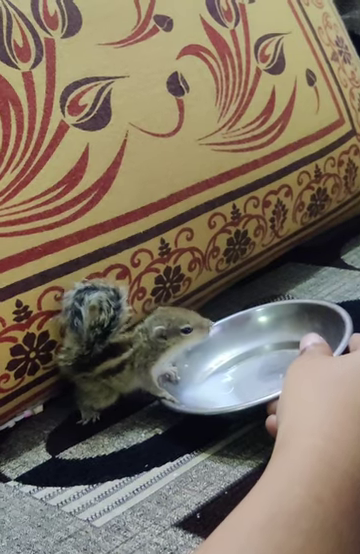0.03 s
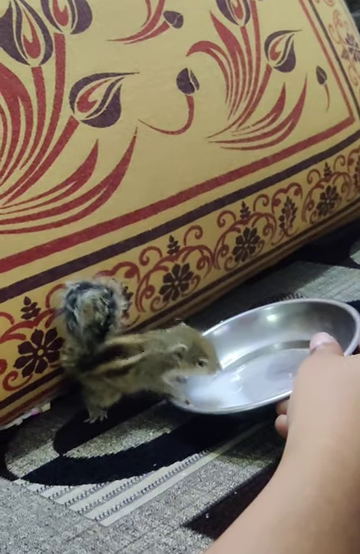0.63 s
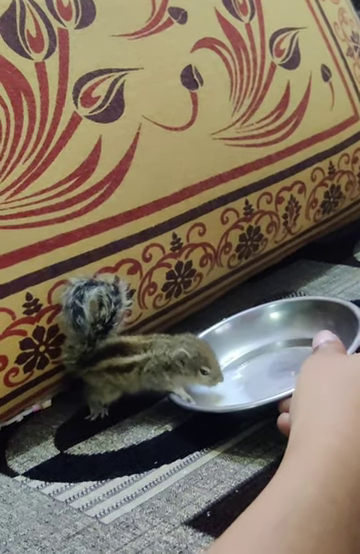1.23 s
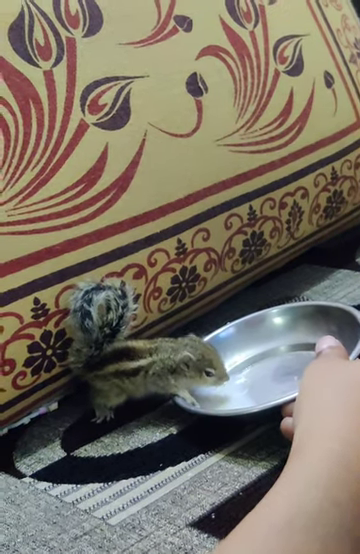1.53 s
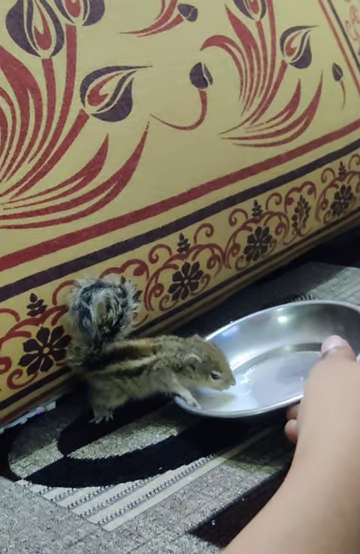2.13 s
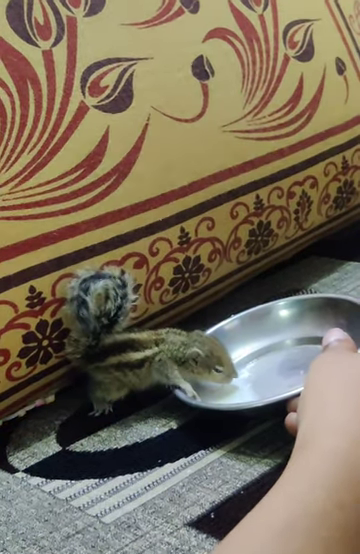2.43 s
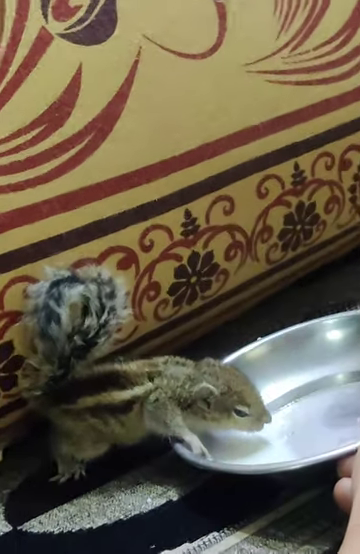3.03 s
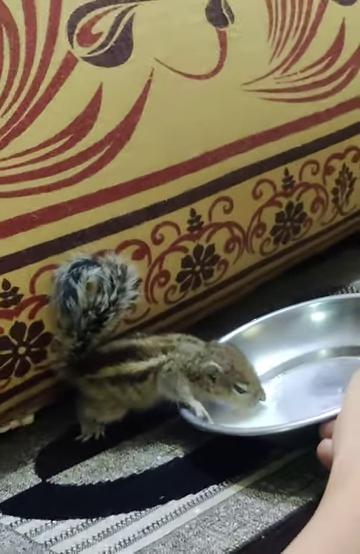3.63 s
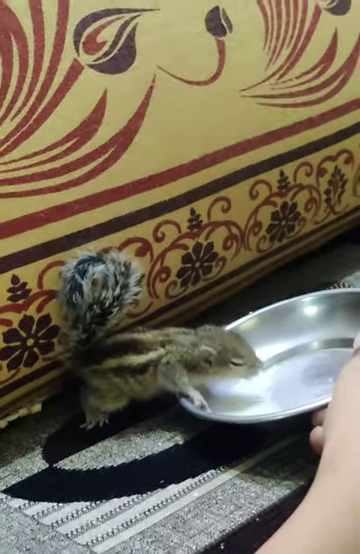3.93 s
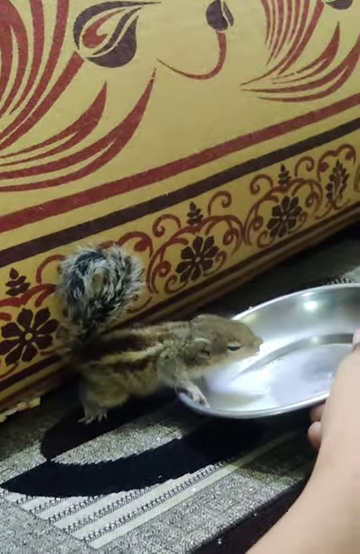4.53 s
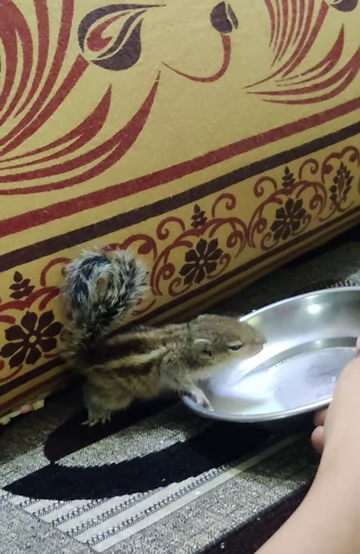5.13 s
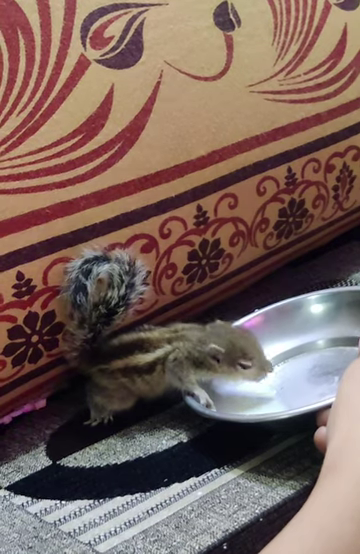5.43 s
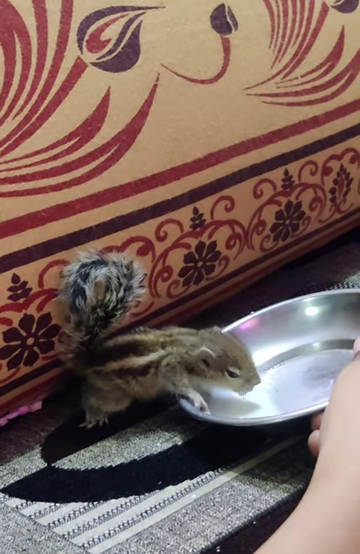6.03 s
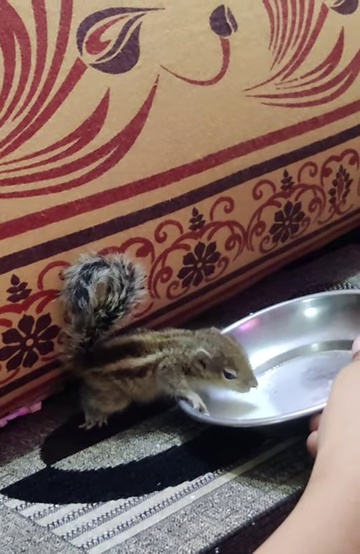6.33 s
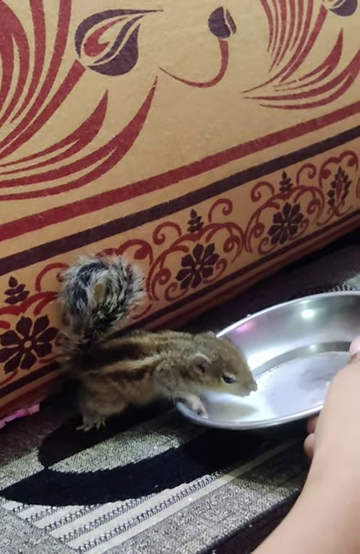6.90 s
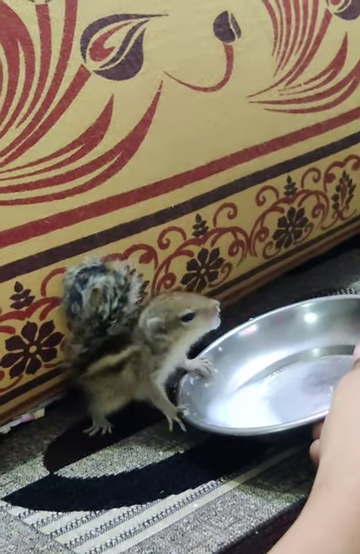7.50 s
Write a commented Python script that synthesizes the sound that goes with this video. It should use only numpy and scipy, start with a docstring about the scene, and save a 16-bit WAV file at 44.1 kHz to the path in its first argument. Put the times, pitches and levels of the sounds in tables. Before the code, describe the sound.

Close to the microphone in a small room, a steel plate gives a bright, quickly choked clink, and a squirrel's claws tick lightly on it. After a knock and a lull, the plate shifts on a rug with a stuttering scrape and a cluster of clinks. Soft handling knocks, rustling cloth and a brief claw skid follow. Two crisp clinks, the loudest sounds, finish over a low-level hiss.

```python
"""A steel plate clinks on a rug as a young squirrel drinks from it, close up in a small, hard-walled room.
Each clink is a bright crack and a short ring, choked by the hand and the rug. The plate shifts in one
jerky stick-slip scrape; claws tick and skid on the steel. Underneath sit soft handling knocks, cloth
rustle, creaking fingers, a low wobble and one faint squeak, over a steady hiss with a thin whine."""
import sys
import numpy as np
from scipy import signal
from scipy.fft import rfft, irfft
from scipy.io import wavfile
from scipy.ndimage import uniform_filter1d

SR = 44100
rng = np.random.default_rng(int(sys.argv[2]) if len(sys.argv) > 2 else 0)


def generate_wav(signal):
    """Clip the signal to [-1, 1] and save it as 16-bit WAV at the path in sys.argv[1]."""
    frames = np.transpose(np.atleast_2d(signal))
    scaled = np.clip(frames, -1, 1) * 32767
    pcm = np.round(scaled).astype(np.int16)
    wavfile.write(sys.argv[1], SR, pcm)


N = 342216
TIME = np.arange(N) / SR

# modes of the hand-damped plate: f/Hz, relative level/dB, t60/s
PLATE_MODES = [(1271, -14, 0.044), (2084, -15.5, 0.25), (2131, -0.5, 0.053), (2950, -7, 0.023),
               (3250, -3.5, 0.06), (3744, -4.5, 0.02), (4150, -5.5, 0.034), (4230, 1.5, 0.016),
               (4455, -14, 0.042), (5959, -12, 0.033), (7160, -7, 0.059), (7400, -34, 0.03)]
# crack of the plate's dense modes: f/Hz, relative level/dB
CRACK_EQ = [(200, -56.5), (500, -21.5), (850, -24.5), (1300, -16), (1650, -15), (2200, -3.5), (2600, -6.5),
            (3250, 2.5), (4150, -7), (5000, -9), (6100, -4), (7600, -10), (8500, -12.5), (15000, -28.5)]
# rim hits: t/s, relative level/dB, ring trim/dB, contact cutoff/Hz, band the struck spot favours/Hz,
# its boost/dB, room send/dB, pitch factor of the grip
CLINKS = [(0.0269, -19.5, -15.5, 11600, 2180, 5, -7.5, 0.92), (3.1690, -20, 0, 3930, 2470, 17.5, -14, 1.06),
          (3.1739, -20.5, -10, 3760, 4400, 18, -7.5, 0.71), (3.3000, -25.5, 0.5, 3750, 2350, 11, -17, 1.05),
          (3.324, -31.5, 3, 5015, 4530, 17, -13, 0.92), (3.3530, -30.5, 3.5, 4120, 2130, 10, -21, 1.0),
          (3.8298, -29.5, 7, 4630, 2065, 8.5, -7.5, 0.98), (3.9588, -35, 3, 4660, 2130, 8, -13, .975),
          (4.2120, -22, 5, 5000, 4560, 6, -13, 1.054), (4.3132, -29.5, 8.5, 5030, 1260, 8, -16, 0.99),
          (6.9581, -11, -3.5, 10600, 7300, 3.5, -5.5, 1.03), (7.5608, -9.5, -6, 9600, 4090, 9, -4.5, 0.997)]
# jerks of the plate over the rug: t/s, hold/s, relative scrape level/dB, relative drag level/dB
SHOVES = [(3.005, 0.053, -51, -55), (3.177, 0.016, -35, -42.5), (3.245, 0.031, -56, -41.5),
          (3.324, 0.037, -33, -78), (3.424, 0.018, -37, -57)]
# tone of scraping steel: f/Hz, relative level/dB
SCRAPE_EQ = [(300, -16.5), (620, -9), (920, 1.5), (1700, -3), (2200, -1.5), (2700, -2.5), (3400, -3.5),
             (4600, -8.5), (5300, -13), (7300, -17), (15000, -46)]
# resonances of the skidding claw: f/Hz, width/Hz, relative level/dB
SCREECH_BANDS = [(1760, 56, -10), (2360, 200, -1), (3310, 150, 0)]
# claws and tongue on the steel: t/s, level/dB
TICKS = [(0.352, -47), (0.393, -48), (0.421, -62), (.478, -50.5), (0.559, -51.5), (0.738, -54),
         (0.769, -56), (3.864, -45), (6.397, -60)]
# handling bumps: t/s, level/dB, treble tilt/(dB per octave)
KNOCKS = [(.8950, -25.5, 2.5), (1.0100, -35.5, -.5), (2.935, -45, -4.5), (3.296, -29.5, 2),
          (3.705, -51.5, -6), (4.606, -42.5, -5), (4.6520, -30.5, -4), (4.8708, -26.5, -3),
          (4.986, -36.5, -2), (5.098, -38, -2.5), (5.144, -37, -1.5), (5.197, -33, -3.5),
          (5.281, -41, -2.5), (5.332, -36, -2.5), (5.362, -35, -3), (5.482, -39, -25), (5.618, -43.5, 0.5)]
# body of a bump: f/Hz, relative level/dB
KNOCK_EQ = [(40, -27), (130, -15), (220, -0.5), (300, 6), (500, -5.5), (1000, -5.5), (2000, -8),
            (4500, -19), (8000, -29.5), (15000, -56)]
# paws and plate landing on the rug: t/s, level/dB
LANDINGS = [(0.312, -64), (0.898, -44), (7.161, -61), (7.409, -70), (7.483, -57), (7.699, -62.5)]
# weight settling on the rug in two steps: t/s, relative level/dB
SETTLES = [(.91, -38.5), (1.023, -45)]
# tone of the dragging rug: f/Hz, relative level/dB
DRAG_EQ = [(30, -8), (55, -42), (120, -5.5), (200, -12), (350, -9.5), (455, 0.5), (560, -8.5), (680, -6),
           (1400, -42), (3000, -28), (12000, -68)]
# cloth strokes: peak t/s, release/s, relative level/dB
CLOTH_STROKES = [(.38, 0.33, -57.5), (.77, .15, -68), (1.086, 0.052, -49), (3.92, 0.4, -54),
                 (4.38, 0.25, -52.5), (4.67, 0.04, -52.5), (4.83, 0.29, -45.5), (5.2, 0.15, -58),
                 (5.5, 0.63, -63)]
# tone of the cloth: f/Hz, relative level/dB
CLOTH_EQ = [(60, -14.5), (500, -4.5), (1100, -7), (2300, -4.5), (3000, -2), (7400, -6.5), (10000, -16),
            (15000, -31)]
# fingers tightening: t/s, hold/s, relative level/dB
GRIPS = [(4.492, 0.015, -52.5), (4.766, .015, -48), (5.013, .01, -47.5), (5.068, 0.057, -44),
         (5.149, 0.046, -43), (5.33, .025, -46)]
# tone of creaking fingers: f/Hz, relative level/dB
CREAK_EQ = [(70, -55), (130, -12), (280, -2.5), (550, -0.5), (800, -6.5), (1550, -4.5), (2150, -18),
            (3500, -37), (7000, -61), (14000, -77)]
# moves of the hand holding the phone: t/s, hold/s, level/dB
SWAYS = [(0.948, 0.042, -50), (2.945, 0.14, -64.5), (3.123, .35, -55.5)]
# pitch line of the squeak: t/s, f/Hz
SQUEAK_GLIDE = [(5.44, 11350), (5.499, 10600), (5.545, 11700), (5.585, 11750), (5.639, 10500),
                (5.749, 8700), (5.81, 8160)]
# tone of the hiss bed: f/Hz, relative level/dB
HISS_EQ = [(30, -3.5), (60, -3), (115, -20), (160, -9.5), (500, -11), (800, -11), (1300, -9.5),
           (1600, -2.5), (2300, -0.5), (3600, -5), (4900, -12.5), (7300, -15.5), (11000, -26.5),
           (15500, -37)]
# partials of the electric whine: f/Hz, level/dB
WHINE_TONES = [(631, -84), (2891, -80), (3451, -76.5), (5782, -83), (10470, -93)]
# early reflections off the nearest surfaces: delay/s, relative gain
ECHOES = [(0.0146, 0.48), (0.023, 0.12), (0.034, 0.16)]

SHOVE_RELEASE_S = 0.056


def clinks(spot_octaves=0.17, ring_trim_db=-8, crack_trim_db=-3, upward_db=2):
    """Each touch on the rim rings the plate; soft contact loses treble and each spot favours some modes."""
    out = np.zeros(N)
    for s, db, ring_db, cutoff_hz, spot_hz, spot_db, room_db, grip in CLINKS:
        def contact(hz):
            boost_db = spot_db * np.exp(-(np.log2((hz + 1) / spot_hz) / spot_octaves) ** 2)
            return boost_db - 10 * np.log10(1 + (hz / cutoff_hz) ** 4)
        crack = burst(t60=0.032, rise_s=0.00058, db_at=lambda hz: shape(CRACK_EQ, hz) + contact(hz))
        add(out, s, undb(db + crack_trim_db) * room(crack, room_db))
        # the flat face throws its ring upwards, so the ring is wetter than the crack
        ring = room(plate_ring(contact, grip), room_db + upward_db)
        add(out, s, undb(db + ring_trim_db + ring_db) * ring)
    return out


def plate_ring(db_at, grip):
    """The plate's modes die away after one touch, weighted by db_at(Hz) and retuned by the grip."""
    t = TIME[:SR // 4]
    modes = np.zeros(len(t))
    for hz, db, t60 in PLATE_MODES:
        decay = undb(db + db_at(hz) - 60 * t / t60)
        modes += decay * np.sin(2 * np.pi * (hz * grip * t + rng.random()))
    return modes * (1 - np.exp(-t / 0.00025))  # the wave takes a moment to fill the plate


def scrape(trim_db=-3, bite_s=0.06, sing_db=-14):
    """Steel rubs and its rim sings at each shove; later a claw skids, ever louder until it lets go."""
    rub = disperse(friction(SCRAPE_EQ, slips_per_s=380, spread_db=1.5, smooth=0.45), lag_s=0.005)
    sing = undb(sing_db) * unit(resonate(rub, hz=4580, width_hz=200))
    screech = unit(sum(undb(db) * resonate(rub, hz, width) for hz, width, db in SCREECH_BANDS))
    shoved = sum(swell(s, hold, db, bite_s, SHOVE_RELEASE_S) for s, hold, db, _ in SHOVES)
    skid = swell(s=4.829, hold_s=0, db=-38, attack_s=0.05, release_s=0.014)
    return undb(trim_db) * shoved * (rub + sing) + skid * screech


def disperse(x, lag_s):
    """Bending waves smear each slip: 1 kHz arrives after lag_s, the treble sooner and the bass later."""
    hz = np.arange(N // 2 + 1) * SR / N
    return irfft(rfft(x) * np.exp(-4j * np.pi * lag_s * np.sqrt(hz * 1000)), N)


def ticks(room_db=-2):
    """Claws and tongue tap the steel, too lightly to make it ring."""
    out = np.zeros(N)
    for s, db in TICKS:
        tick = burst(t60=0.033, rise_s=0.00023, db_at=lambda hz: shape(CRACK_EQ, hz))
        add(out, s, undb(db) * room(tick, room_db))
    return out


def knocks(t60=0.028, rise_s=0.00021, room_db=-7):
    """Dull bumps of hand and plate; the harder ones tend to be brighter."""
    out = np.zeros(N)
    for s, db, tilt_db in KNOCKS:
        blow = burst(t60, rise_s, lambda hz: shape(KNOCK_EQ, hz) + tilt_db * np.log2(1 + hz / 400))
        add(out, s, undb(db) * room(blow, room_db))
    return out


def landings(cutoff_hz=210):
    """Paws and plate come down on the rug: cushioned thuds, all low end."""
    out = np.zeros(N)
    for s, db in LANDINGS:
        thud = burst(t60=0.18, rise_s=0.0041, db_at=lambda hz: -10 * np.log10(1 + (hz / cutoff_hz) ** 6))
        add(out, s, undb(db) * thud)
    return out


def rug_drag(trim_db=-2):
    """The rug catches and slips with a dark grain as the plate is shoved or weight settles."""
    shoved = sum(swell(s, hold, db, attack_s=0.089, release_s=SHOVE_RELEASE_S) for s, hold, _, db in SHOVES)
    settled = sum(swell(s, hold_s=0.0068, db=db, attack_s=0.011, release_s=0.045) for s, db in SETTLES)
    grain = friction(DRAG_EQ, slips_per_s=400, spread_db=3, smooth=0.31)
    return undb(trim_db) * (shoved + settled) * grain


def cloth_rustle(trim_db=-2, attack_ratio=0.83):
    """Fine, dense slips of cloth; each stroke swells a little faster than it fades."""
    strokes = sum(swell(s, 0, db, attack_ratio * release, release) for s, release, db in CLOTH_STROKES)
    return undb(trim_db) * strokes * friction(CLOTH_EQ, slips_per_s=1700, spread_db=5, smooth=0.99)


def finger_creak(trim_db=-2):
    """Fingers creak in coarse slips as they tighten their grip."""
    grips = sum(swell(s, hold, db, attack_s=0.024, release_s=0.042) for s, hold, db in GRIPS)
    return undb(trim_db) * grips * friction(CREAK_EQ, slips_per_s=120, spread_db=4, smooth=0.56)


def hand_sway(hz=46, stage_width_hz=28):
    """A sub-bass wobble each time the hand holding the phone moves."""
    rumble = resonate(rng.standard_normal(N), hz, stage_width_hz)
    wobble = unit(resonate(rumble, hz, stage_width_hz))
    return wobble * sum(swell(s, hold, db, attack_s=0.04, release_s=0.24) for s, hold, db in SWAYS)


def squeak(db=-77, fade_s=0.046, room_db=-6):
    """A faint, very thin tone that wavers and falls."""
    times, hz = np.transpose(SQUEAK_GLIDE)
    pitch = uniform_filter1d(np.interp(TIME, times, hz), SR // 40)
    tone = np.sin(2 * np.pi * np.cumsum(pitch) / SR)
    envelope = swell(times[0], times[-1] - times[0], db, fade_s, fade_s)
    return room(envelope * tone, room_db)[:N]


def room(x, send_db, low_t60=0.45, high_t60=0.37, gap_s=0.014, crossover_hz=4000):
    """Hard walls add early reflections and a diffuse tail whose treble dies first."""
    t = TIME[:int(0.7 * SR)]
    noise = rng.standard_normal(len(t))
    low = signal.sosfilt(signal.butter(1, crossover_hz, fs=SR, output="sos"), noise)
    tail = low * undb(-60 * t / low_t60) + (noise - low) * undb(-60 * t / high_t60)
    tail *= np.clip(t / gap_s - 0.5, 0, 1)  # pre-delay, then a quick fade-in
    tail /= np.linalg.norm(tail)
    for s, gain in ECHOES:
        tail[int(s * SR)] += gain
    response = undb(send_db) * tail
    response[0] = 1  # the direct sound
    return signal.fftconvolve(x, response)


def hiss_bed(hiss_db=-61.5):
    """Steady hiss with a faint electric whine in it."""
    hiss = undb(hiss_db) * unit(colour(rng.standard_normal(N), lambda hz: shape(HISS_EQ, hz)))
    whine = sum(undb(db) * np.sqrt(2) * np.sin(2 * np.pi * hz * TIME) for hz, db in WHINE_TONES)
    return hiss + whine


def burst(t60, rise_s, db_at):
    """A blow into many close modes: decaying noise, its spectrum evened out and then EQ'd by db_at(Hz)."""
    t = TIME[:SR // 4]
    envelope = undb(-60 * t / t60) * (1 - np.exp(-t / rise_s))
    blow = envelope * rng.standard_normal(len(t))
    ripple_db = 10 * np.log10(uniform_filter1d(abs(rfft(blow)) ** 2, size=40))
    bin_hz = np.arange(len(ripple_db)) * SR / len(t)
    hit = colour(blow, lambda hz: db_at(hz) - np.interp(hz, bin_hz, ripple_db))
    return unit(hit) * np.sqrt(np.mean(envelope ** 2))


def friction(eq, slips_per_s, spread_db, smooth):
    """Uneven stick and slip, at roughly slips_per_s, over a smooth rub, coloured by the body; rms 1."""
    gaps, sizes = rng.standard_normal((N // 8, 2)).T
    onsets = (np.cumsum(np.exp(gaps / 2)) * SR / slips_per_s).astype(int)
    kicks = np.sign(sizes) * undb(spread_db * abs(sizes))
    slips = np.bincount(onsets[onsets < N], kicks[onsets < N], N)
    force = unit(slips) + smooth * rng.standard_normal(N)
    return unit(colour(force, lambda hz: shape(eq, hz)))


def swell(s, hold_s, db, attack_s, release_s):
    """Envelope that reaches db at s and holds; attack and release are the times for a 20 dB change."""
    early, late = np.maximum(s - TIME, 0), np.maximum(TIME - s - hold_s, 0)
    return undb(db) * 10 ** -np.minimum(early / attack_s + late / release_s, 10)


def resonate(x, hz, width_hz):
    """One resonance, gain 1 at its centre."""
    return signal.lfilter(*signal.iirpeak(hz, hz / width_hz, fs=SR), x)


def colour(x, db_at, size=4096):
    """Minimum-phase EQ with the curve db_at(Hz): no pre-ring ahead of a transient."""
    hz = np.arange(size // 2 + 1) * SR / size
    cepstrum = irfft(np.log(undb(db_at(hz))))
    cepstrum[1:size // 2] *= 2
    cepstrum[size // 2 + 1:] = 0
    response = irfft(np.exp(rfft(cepstrum)))
    return signal.fftconvolve(x, response)[:len(x)]


def shape(eq, hz):
    """Level in dB at hz on an EQ curve of (f/Hz, level/dB) points."""
    point_hz, db = np.transpose(eq)
    return np.interp(np.log(hz + 1), np.log(point_hz), db)


def add(track, s, x):
    """Mix x into the track at s seconds."""
    start = max(int(s * SR), 0)
    track[start:start + len(x)] += x[:N - start]


def undb(db):
    """Decibels to gain."""
    return 10 ** (np.asarray(db) / 20)


def unit(x):
    """Scale to rms 1."""
    return x / np.sqrt(np.mean(x ** 2))


def scene():
    """The mix, panned dead centre; the fingers are closer, so drier than the other rubbing."""
    hits = clinks() + knocks() + ticks() + landings()
    drag, cloth, creak = rug_drag(), cloth_rustle(), finger_creak()
    rubbing = room(scrape() + drag + cloth, send_db=-7) + room(creak, send_db=-11)
    mono = hits + rubbing[:N] + hand_sway() + squeak() + hiss_bed()
    return np.array([mono, mono])


def record(dry):
    """The phone cuts the top end steeply above 15.75 kHz."""
    return signal.sosfilt(signal.ellip(10, 0.2, 70, 15750, fs=SR, output="sos"), dry)


dry = scene()
out = record(dry)
generate_wav(out)
```